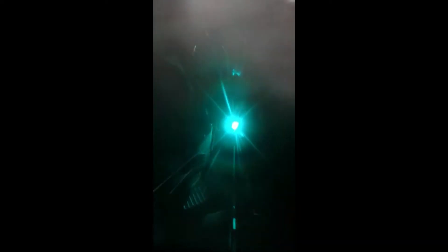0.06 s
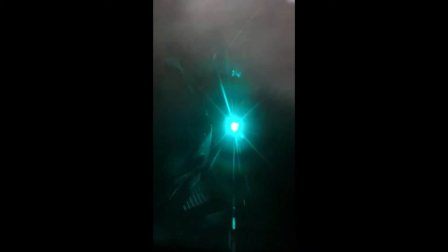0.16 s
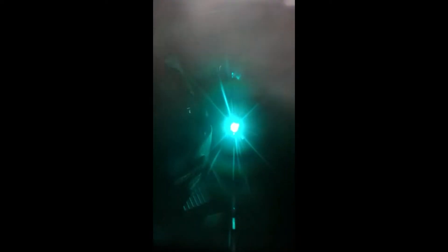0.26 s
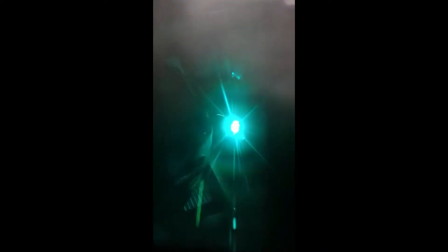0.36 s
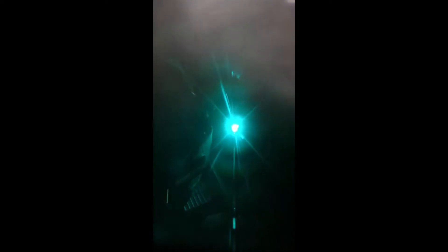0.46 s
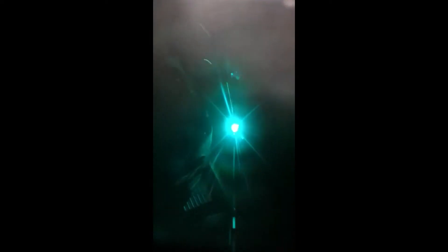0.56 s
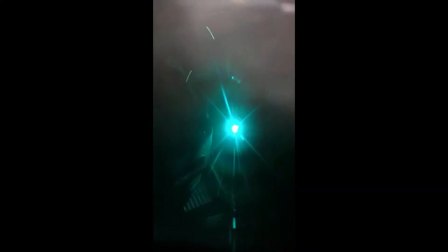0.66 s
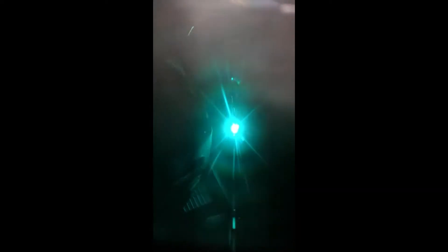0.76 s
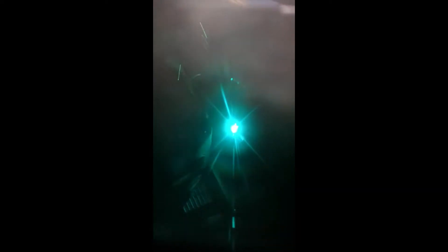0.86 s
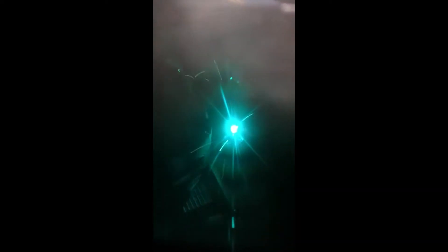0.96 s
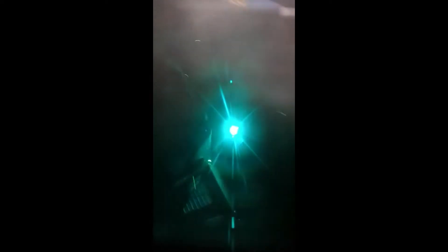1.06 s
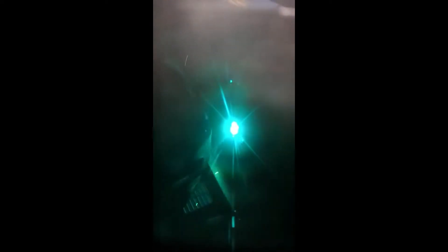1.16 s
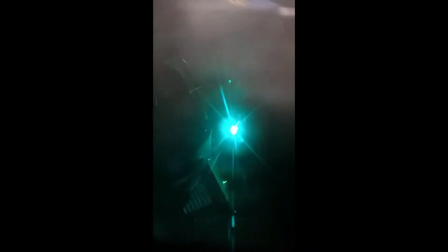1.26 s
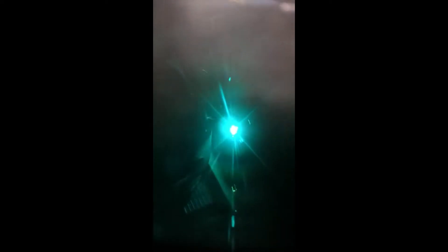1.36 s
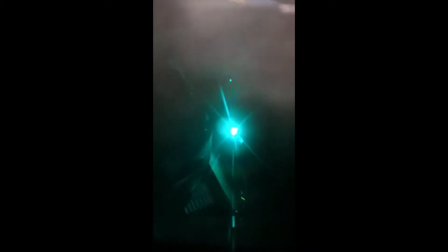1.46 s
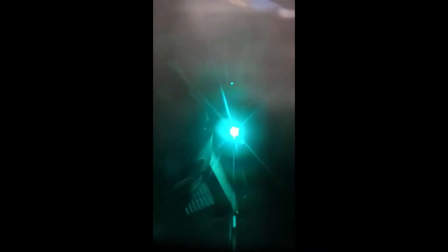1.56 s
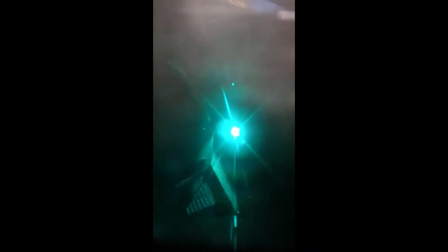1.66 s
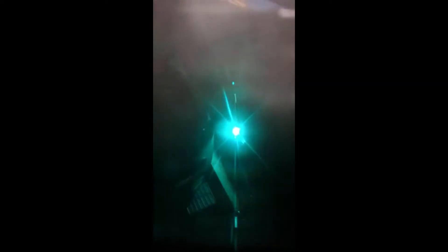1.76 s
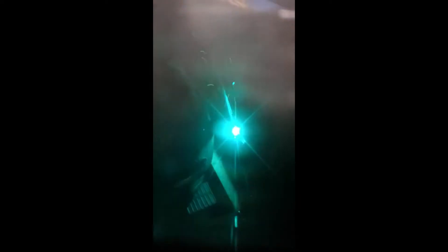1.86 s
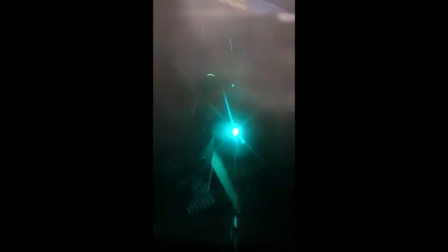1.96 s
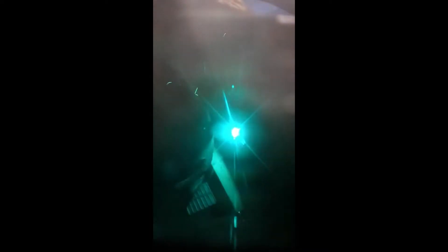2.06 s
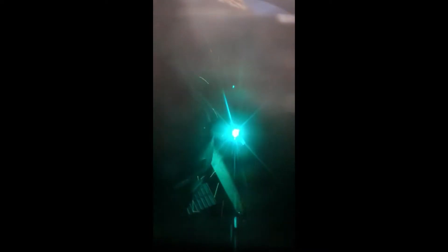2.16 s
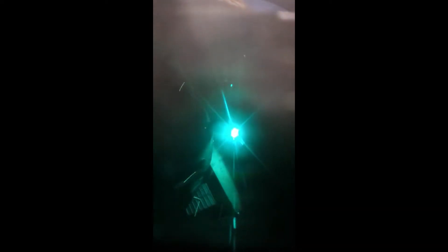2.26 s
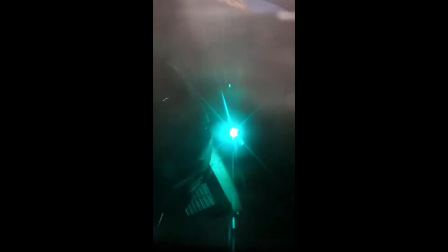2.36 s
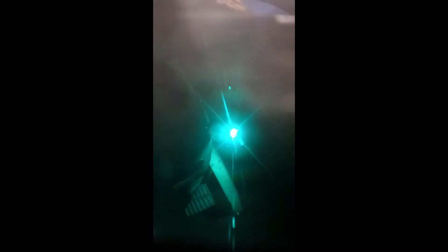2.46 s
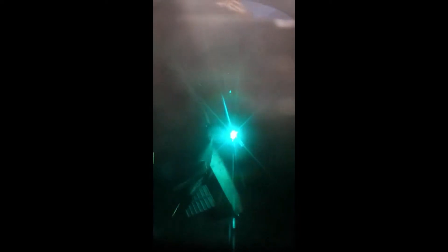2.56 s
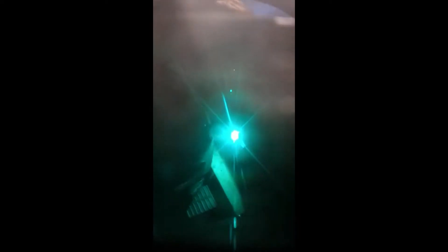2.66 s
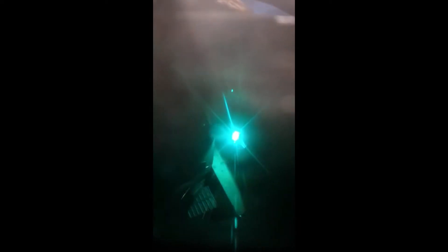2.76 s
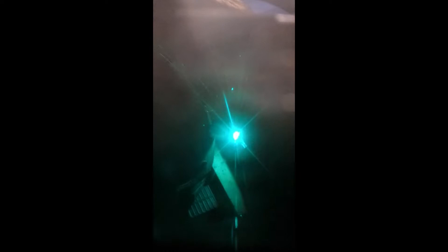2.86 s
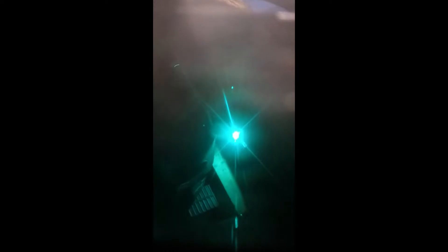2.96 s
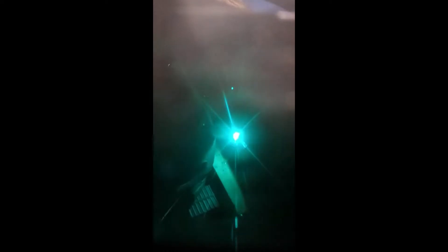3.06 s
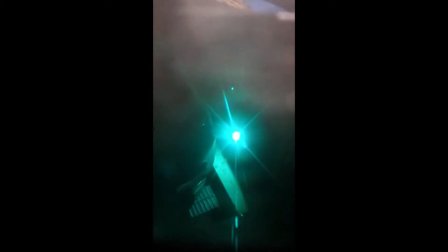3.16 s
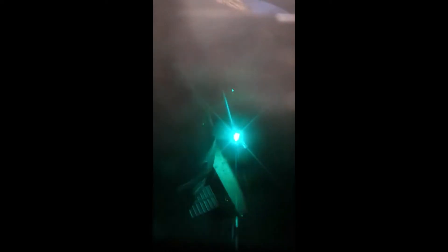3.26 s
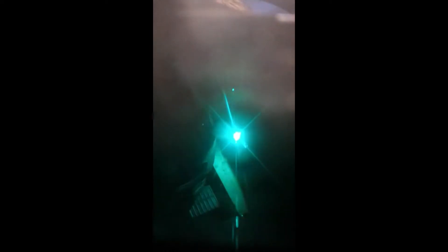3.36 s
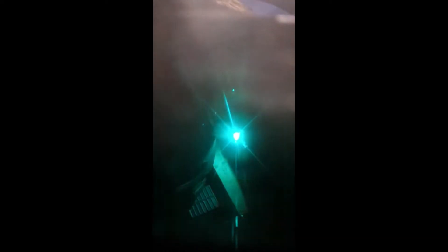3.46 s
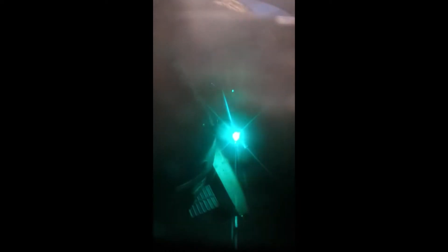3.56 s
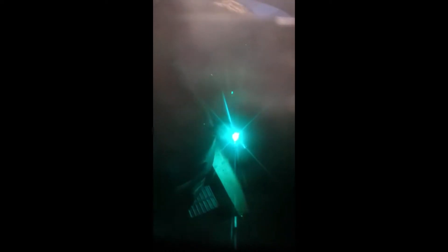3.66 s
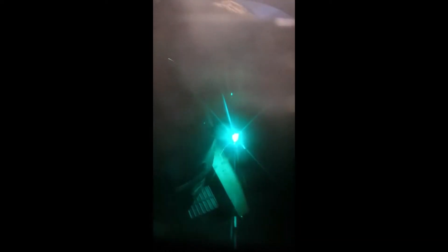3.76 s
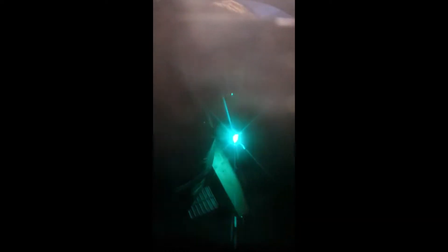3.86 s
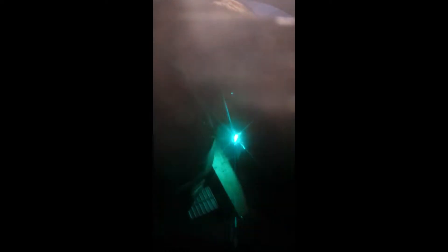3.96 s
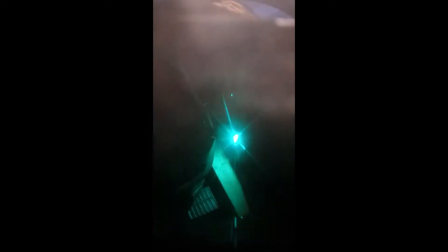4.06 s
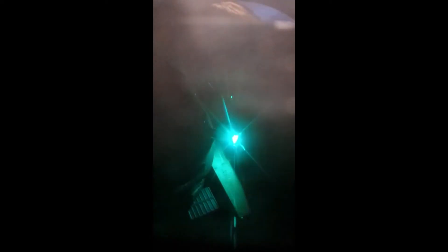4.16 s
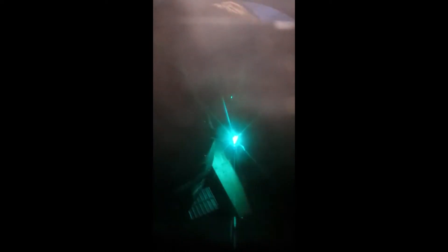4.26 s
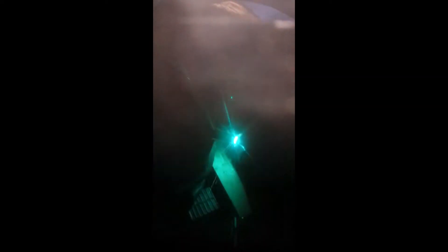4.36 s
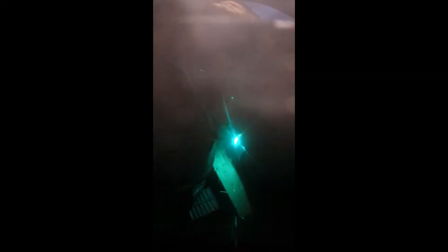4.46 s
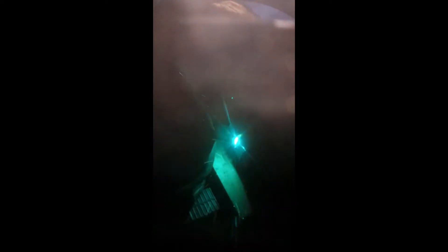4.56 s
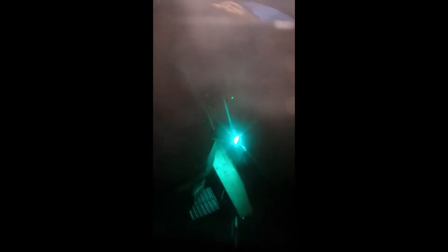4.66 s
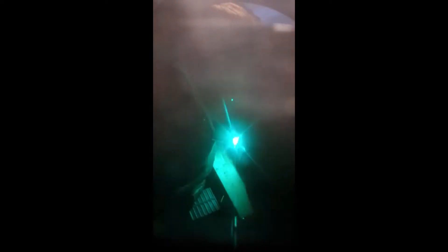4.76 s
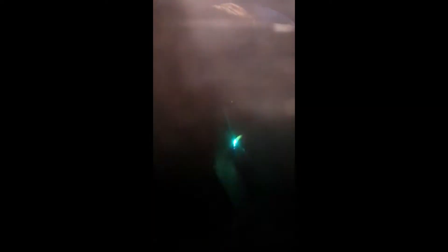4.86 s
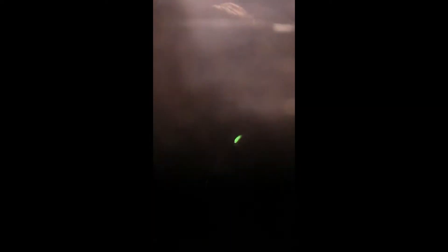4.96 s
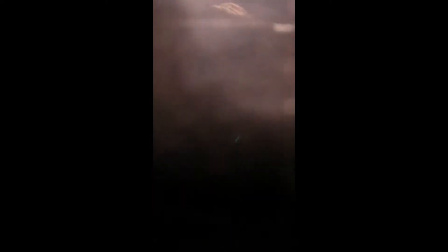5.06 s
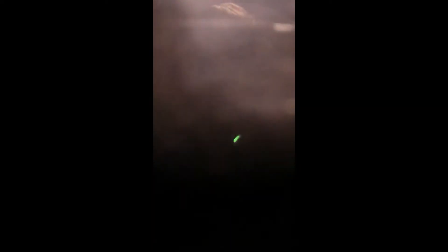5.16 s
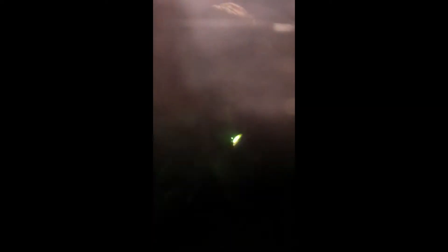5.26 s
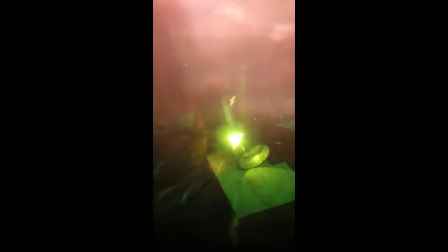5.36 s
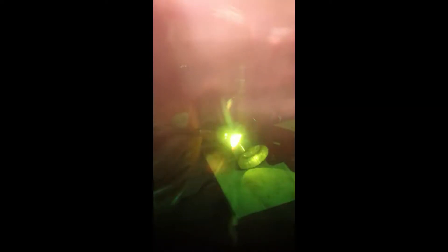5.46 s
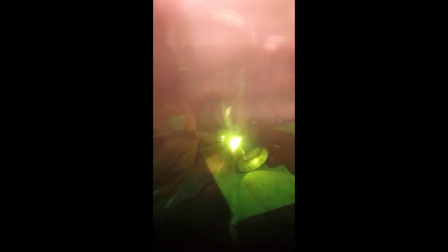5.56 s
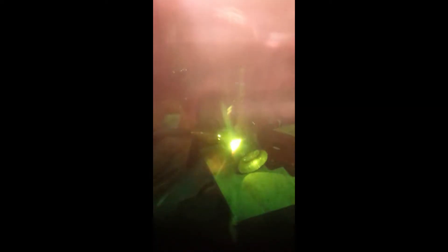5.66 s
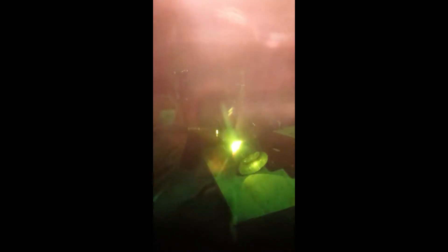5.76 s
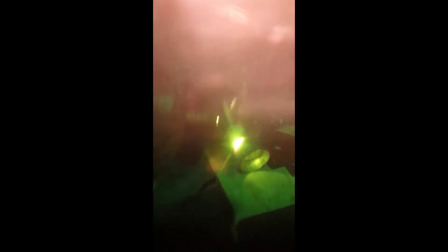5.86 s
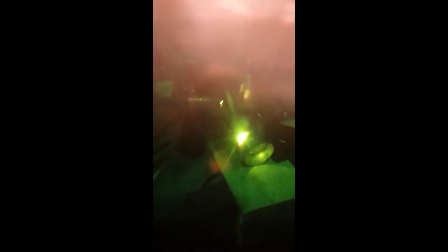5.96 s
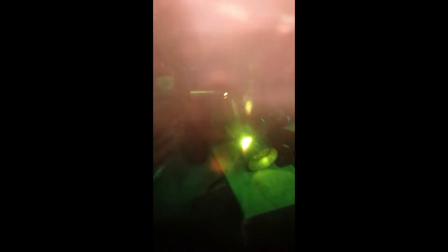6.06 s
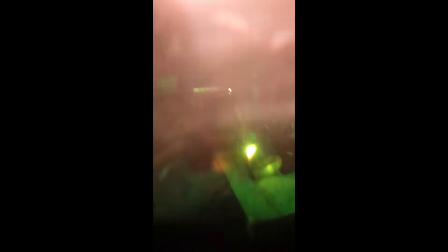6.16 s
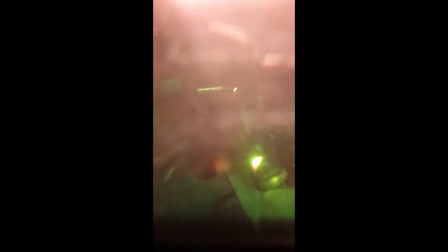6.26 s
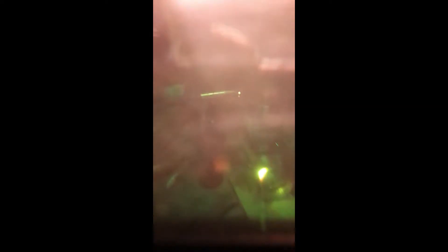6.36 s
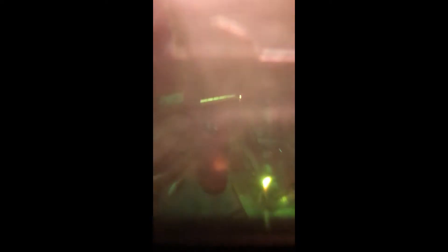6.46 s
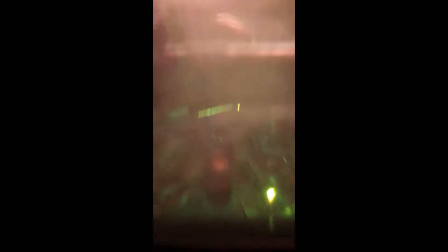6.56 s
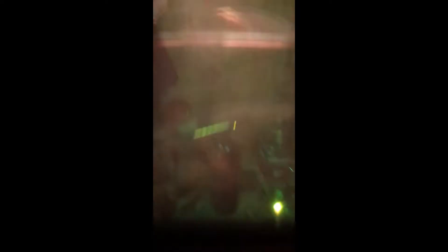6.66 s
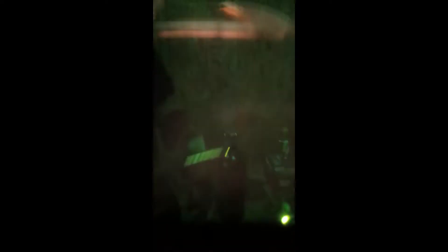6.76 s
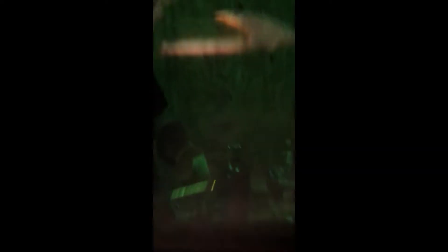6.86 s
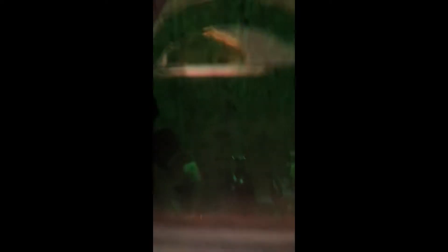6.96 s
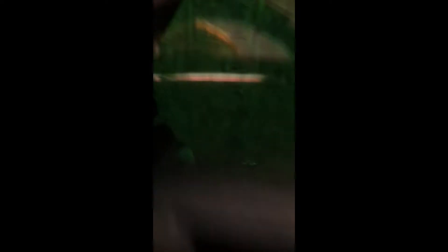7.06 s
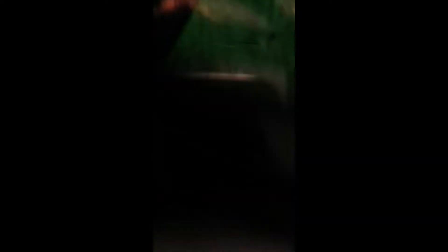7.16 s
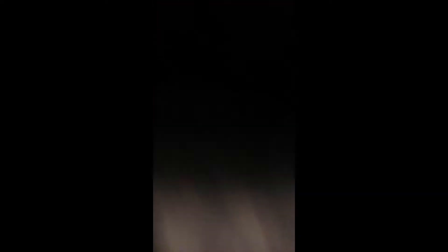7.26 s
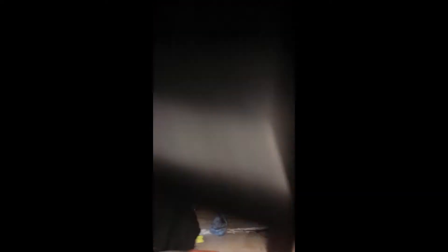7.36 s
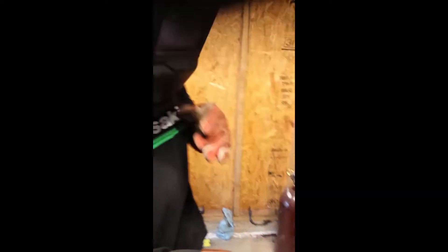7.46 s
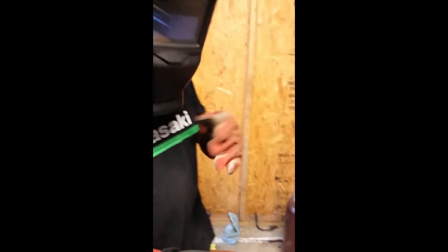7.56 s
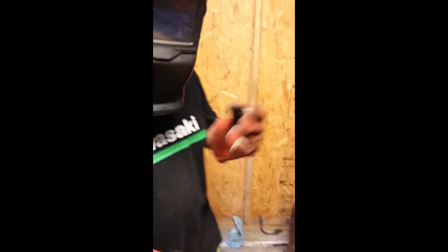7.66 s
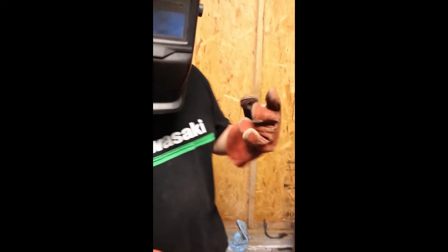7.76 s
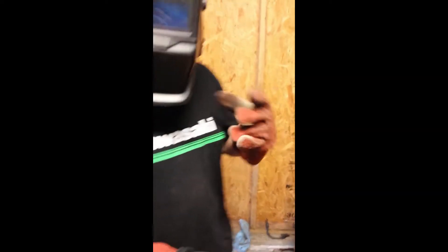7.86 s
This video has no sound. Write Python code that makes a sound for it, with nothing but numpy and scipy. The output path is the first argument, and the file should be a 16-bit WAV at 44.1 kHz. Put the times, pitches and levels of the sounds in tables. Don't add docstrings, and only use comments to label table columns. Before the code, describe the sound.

Close, raspy wire-feed welding with rapid irregular pops over buzzing hiss, then an abrupt stop, low wavering hum, a tiny tick and handling noises.

```python
import sys
import numpy as np
from scipy import signal
from scipy.fft import rfft, irfft
from scipy.io import wavfile
from scipy.ndimage import uniform_filter1d, minimum_filter1d

SR = 44100
rng = np.random.default_rng(int(sys.argv[2]) if len(sys.argv) > 2 else 0)


def elevation(decibels):
    levels = np.asarray(decibels, float)
    return 10 ** (levels / 20)


def store_pcm(level_fs):
    pcm = np.round(np.clip(level_fs, -1, 1) * 32767).astype(np.int16)
    wavfile.write(sys.argv[1], SR, np.atleast_2d(pcm).T)


N = 348390
T = np.arange(N) / SR

RIPPLE_HZ, RIPPLE_START_S = 120.0, 0.0022
ARC_END_S = 4.93

# start_s, pocket_strength_db, turned_aside (0-1)
MASK_TURN = [
    (0.0, -2, 0.16),
    (1.9, -0.5, 0.12),
    (2.6, 1.5, 0.53),
    (3.2, 0.5, 0.6),
    (4.93, 1.5, 0.88),
]
# pitch_hz, likeness (0-1)
ARC_SAME = [(60, 0.8), (180, 0.87), (550, 0.96), (1100, 0.23), (1900, 0.535), (2600, 0.14), (4970, 0.6),
            (15000, 0.015)]
# pitch_hz, likeness (-1 to 1)
AIR_SAME = [(60, 0.28), (180, 1), (550, 0.63), (1650, -0.3), (4970, 0.033), (15000, 0.25)]
# pitch_hz, level_db
ROAR = [(30, -86), (90, -23), (150, -11.5), (230, -3), (275, -5), (315, -0.5), (420, -19.5), (600, -18),
        (1000, -22.5)]


def evened(x):
    return x / np.sqrt(np.mean(x ** 2) + 1e-20)


def read(points, hz):
    f, value = np.transpose(points)
    return np.interp(np.log(hz + 1), np.log(f + 1), value)


def columns(rows):
    s, *values = np.transpose(rows)
    return [np.interp(T, s, v) for v in values]


def causal(gain):
    log_gain = np.log(np.r_[gain, gain[-2:0:-1]] + 1e-5)
    return np.fft.ifft(np.exp(np.conj(signal.hilbert(log_gain)))).real[:len(gain)]


def pair(same, count):
    a, b = rfft(rng.standard_normal((2, count)))
    likeness = np.clip(read(same, np.fft.rfftfreq(count, 1 / SR)), -1, 1)
    return irfft(np.array([a, likeness * a + np.sqrt(1 - likeness ** 2) * b]), count)


def shaped(x, spectrum):
    return evened(irfft(rfft(x) * elevation(read(spectrum, np.fft.rfftfreq(N, 1 / SR))), N))


def wander(per_s):
    knots = rng.standard_normal(int(N / SR * per_s) + 3)
    return evened(np.interp(T * per_s, np.arange(len(knots)), knots))


def idle():
    release_s, recovery_s = 5.82, 0.29
    back = 1 - np.exp(-np.maximum(T - release_s, 0) / recovery_s)
    creep_db = 4 * (np.clip(T, ARC_END_S, release_s) - ARC_END_S)
    clear = (1 + np.tanh((T - 7.16) / 0.091)) / 2
    air_db = -57.5 + creep_db + 16 * back - 2.5 * clear
    treble_db = -11 + 6.5 * clear
    hum_db = 3.5 + 2 * clear
    blade_db = -4 + 4.5 * back - 5.5 * clear
    return air_db, treble_db, hum_db, blade_db


def shop():
    # pitch_hz, level_db
    air_low = [(20, -38.5), (60, -14.5), (112, -15), (170, -6), (225, 2.5), (280, -5), (325, 3),
               (400, -6.5), (520, -7), (700, -7.5), (900, -9), (1150, -17.5), (2500, -20), (3500, -42)]
    air_high = [(710, -28), (1200, 0), (1660, -16), (1790, -9), (3180, 0.5), (5300, -0.5), (6510, -7.5),
                (13900, -18), (15500, -25), (16000, -63)]
    # pitch_hz, left_right_db
    air_pan = [(60, 0.45), (150, 1.7), (380, 0.46), (950, 1.4), (2380, 6), (5980, 6.1), (15000, 0.85)]
    tone_hz = [119.99, 239.98, 252.57, 505.14, 757.7, 861, 1010.3, 1262.9]
    # level_db, waver_db
    tone_levels = [(-21.5, 1.5), (0, -1), (-3.5, 0.5), (-7.5, 1), (-24.5, 1), (-15.5, 1.5), (-27, 4.5),
                   (-26.5, 2.5)]
    in_step_s = 6.977
    mask_off_s = 6.45
    pocket_hz, pocket_width_hz, pocket_db = 6000, 370, 5

    air_db, treble_db, hum_db, blade_db = idle()
    hz = np.fft.rfftfreq(N, 1 / SR)
    air = shaped(pair(AIR_SAME, N), air_low) * elevation(4.0 + wander(6.6))
    air += shaped(pair(AIR_SAME, N), air_high) * elevation(treble_db + 3.5 + 1.1 * wander(15))

    inside = np.clip((mask_off_s + 0.3 - T) * 5, 0, 1)
    pocket = (elevation(pocket_db) - 1) / (1 + (2 * (hz - pocket_hz) / pocket_width_hz) ** 2)
    air += inside * irfft(rfft(air) * pocket, N)
    lean_db = read(air_pan, hz) / 2
    air = irfft(rfft(air) * elevation(np.array([lean_db, -lean_db])), N)

    tones = []
    for pitch_hz, (level_db, waver_db) in zip(tone_hz, tone_levels):
        wave = np.sin(2 * np.pi * pitch_hz * (T - in_step_s))
        tones.append(elevation(level_db + waver_db * wander(8.5)) * wave)
    tones[5] = tones[5] * np.clip((mask_off_s - T) * 5, 0, 1)
    hum = sum(tones[:3]) + tones[5] + elevation(blade_db) * sum(tones[3:5] + tones[6:])
    hum_lean = elevation(np.array([[0.6], [-0.6]]))
    return elevation(air_db) * (air + np.sqrt(2) * elevation(hum_db) * hum * hum_lean)


def tick():
    # pitch_hz, level_db
    tick_colour = [(1500, -19), (4500, -12), (6000, -2), (7000, 2), (8500, -8.5), (12000, -14),
                   (16000, -16)]
    since = np.maximum(T - 5.5305, 0) / 0.0006
    return elevation(-44) * np.e * since * np.exp(-since) * shaped(rng.standard_normal((2, N)), tick_colour)


def rustles():
    # start_s, rise_s, fall_s, level_db, left_right_db
    touches = [
        (6.53, 0.018, 0.034, -44.5, 5.5),
        (6.661, 0.032, 0.039, -35.5, 3.5),
        (7.0, 0.046, 0.03, -46.5, 6),
        (7.154, 0.0012, .003, -42, 8.),
        (7.292, 0.024, 0.049, -39.5, 10.5),
        (7.859, 0.0028, 0.029, -30, 7),
    ]
    # pitch_hz, level_db
    plastic = [(880, -48), (1500, -9), (2190, -9), (2410, -12), (5440, 0.5), (6060, -6.5), (13000, -16),
               (16000, -20)]
    strength = np.zeros((2, N))
    for s, rise, fall, db, lean in touches:
        swell = np.exp(-((T - s) / rise) ** 2)
        fade = np.exp(-np.maximum(T - s, 0) / fall)
        sides = elevation(np.array([[db + lean / 2], [db - lean / 2]]))
        strength += np.where(T < s, swell, fade) * sides
    return strength * shaped(rng.standard_normal((2, N)), plastic) * elevation(2.0 * wander(300))


def thud():
    since = np.maximum(T - 4.94, 0)
    shape = (1 - np.exp(-since / 0.0044)) * np.exp(-since / 0.068)
    return elevation(-30) * shaped(pair(AIR_SAME, N), ROAR) * shape


def load_hum():
    # pitch_hz, level_db (rms)
    load_tones = [(120, -56.5), (240, -41.5), (360, -56)]
    on = np.exp(-np.maximum(T - ARC_END_S, 0) / 0.042)
    hum = 0
    for hz, db in load_tones:
        hum = hum + np.sqrt(2) * elevation(db + wander(9.1)) * np.sin(2 * np.pi * hz * T)
    return on * hum


def roar(drive, bass_db):
    power = signal.lfilter([1], [1, -np.exp(-1 / (0.0112 * SR))], drive ** 2) + 1e-12
    after = np.exp(-np.maximum(T - ARC_END_S, 0) / 0.12)
    return elevation(-37.5 + bass_db) * shaped(pair(ARC_SAME, N), ROAR) * evened(power ** 0.24 * after)


def tail():
    # pitch_hz, t60_s
    shop_t60 = [(660, 0.41), (1740, 0.3), (3600, 0.37), (6500, 0.5), (9000, 0.42), (13000, 0.24)]
    tail_db, gap_s = np.array([-0.5, -3.0]), 0.0011
    t = np.arange(SR // 2) / SR
    hz, frame_s, z = signal.stft(pair(ARC_SAME, len(t)), SR, nperseg=256)
    decay = elevation(-60 * frame_s / read(shop_t60, hz)[:, None])
    taps = signal.istft(z * decay, SR, nperseg=256)[1][:, :len(t)]
    taps = taps * (1 - np.exp(-t / gap_s))
    return elevation(tail_db)[:, None] * taps / np.linalg.norm(taps, axis=1, keepdims=True)


def rattle():
    fall_s, late_s = np.array([[0.0015], [0.0006]]), np.array([[0.0007], [0.00015]])
    direct, low_share = np.array([[0.5], [0.95]]), 0.66
    since = np.maximum(np.arange(600) / SR - late_s, 0) / fall_s
    z = rfft(rng.standard_normal(since.shape) * since ** 0.5 * np.exp(-since))
    z = z / np.sqrt(uniform_filter1d(abs(z) ** 2, size=21, axis=1))
    low = 1 / (1 + (np.fft.rfftfreq(600, 1 / SR) / 1900) ** 4)
    click = np.zeros(since.shape)
    click[[0, 1], [6, 0]] = 1
    mixed = z * (1 - low) + rfft(click) * (direct + low_share * low)
    return np.roll(irfft(mixed, 600), 30, axis=1)


def shell(x, share):
    late = signal.sosfilt(signal.butter(2, 1300, fs=SR, output="sos"), x)
    return x - share * np.roll(late, round(0.0027 * SR))


def port(x, spectrum, pockets):
    hz = np.fft.rfftfreq(8192, 1 / SR)
    pocket_db, turned = columns(MASK_TURN)
    plain = signal.oaconvolve(x, causal(elevation(read(spectrum, hz))))[:N]

    def resonance(db_column):
        lift = np.ones(len(hz))
        for pocket in pockets:
            bell = 1 + (2 * (hz - pocket[0]) / pocket[1]) ** 2
            lift = lift * (1 + (elevation(pocket[db_column]) - 1) / bell)
        return signal.oaconvolve(plain, causal(lift))[:N] - plain

    facing, aside = resonance(2), resonance(3)
    return plain + elevation(pocket_db) * (facing + np.clip(turned, 0, 1) * (aside - facing))


def current():
    # start_s, level_db
    course = [(0.0, 6.5), (0.22, -4), (0.6, -3), (0.9, 0), (1.2, -3), (1.62, 0.5), (1.8, 1), (2.0, -4.5),
              (2.31, 5), (2.43, -2), (2.6, 2.5), (2.88, 2.5), (3.2, -0.5), (3.5, 0), (3.8, 0.2),
              (4.4, -0.5), (4.68, -2), (4.93, -12.5)]
    # restrike_s, dimming_db
    shorts = [(0.101, 30.5), (.167, 18.5), (.344, 5.5), (.435, -2.5), (.569, 2), (.643, 8), (.81, -5),
              (.936, -0.5), (1.202, 24), (1.294, 13), (1.675, 19), (1.718, 7), (1.819, 7), (1.886, 21),
              (2.102, 11), (2.351, 13.5), (2.559, 3.5), (2.692, 2), (2.819, 17), (3.084, 5.5), (3.127, 19),
              (3.215, 13.5), (3.359, -2.5), (3.776, 7), (3.936, 12), (4.134, 17), (4.168, 11), (4.278, 3.5),
              (4.561, 14.5), (4.928, 6)]
    dim_db = sum(db * np.exp(-abs(s - T) / 0.026) * (T < s - 0.001) for s, db in shorts)
    return columns(course)[0], dim_db


def droplets(strength_db, pop_db):
    # start_s, peak_db
    drops_1 = [(0.0175, -14), (0.043, -10), (0.0696, -9.5), (0.0772, -8.0), (0.1027, -6.0), (0.1339, -12),
               (0.1429, -8), (0.1674, -7.5), (0.2337, -12.5), (0.26, -9), (0.267, -11.5), (0.2928, -12),
               (0.3008, -7.5), (0.3255, -13.5), (0.3444, -7.5), (0.3764, -11), (0.3832, -14.0),
               (0.4097, -10.5), (0.4358, -5), (0.444, -9.5), (0.4705, -13.0), (0.495, -12), (0.5178, -13.5),
               (0.5426, -11.5), (0.5696, -9.0), (0.5772, -8), (0.5856, -12.5), (0.6013, -9.5), (0.6107, -9),
               (0.6432, -6.5), (0.652, -15), (0.6764, -11), (0.7116, -12), (0.718, -12), (0.7354, -13),
               (0.7441, -8.5), (0.7686, -14), (0.81, -7.5), (0.8518, -10.5), (0.9173, -13.5), (0.9362, -8),
               (0.9623, -12.5), (0.9796, -11), (1.021, -11.5), (1.0358, -11.5), (1.062, -11),
               (1.1006, -12.0), (1.1292, -10.0), (1.1434, -15), (1.16, -17), (1.1679, -8.5), (1.1762, -12),
               (1.202, -6.5), (1.2106, -9.5), (1.2363, -9.5), (1.2588, -11), (1.2939, -8.5), (1.3175, -8.5),
               (1.3338, -12)]
    drops_2 = [(1.3611, -9), (1.3778, -14), (1.3939, -8.5), (1.4079, -11.5), (1.4287, -12.5),
               (1.4541, -10.5), (1.4959, -12), (1.5106, -16.5), (1.5179, -11), (1.5416, -13.0),
               (1.5581, -10), (1.6008, -9.5), (1.6754, -12.5), (1.6924, -9), (1.7181, -4), (1.7264, -11.0),
               (1.7442, -14.5), (1.7539, -13.0), (1.778, -10), (1.7865, -16.5), (1.801, -11.5),
               (1.8193, -7), (1.8276, -12.5), (1.862, -12.0), (1.8863, -10.5), (1.9082, -9.5),
               (1.9328, -14.5), (1.9538, -15), (1.9753, -12.5), (1.9953, -13), (2.0123, -14.5),
               (2.0282, -12.0), (2.0418, -10), (2.0581, -11.5), (2.0753, -13.5), (2.1014, -9.5),
               (2.1087, -5.5), (2.1173, -14.5), (2.1427, -7.5), (2.1615, -11.0), (2.1834, -10),
               (2.2005, -3), (2.2202, -13), (2.2275, -16.0), (2.2629, -14), (2.2683, -16.5), (2.2783, -14),
               (2.2852, -12.5), (2.2933, -7.5), (2.3017, -9.5), (2.3109, -8.5), (2.3187, -9.5),
               (2.3422, -8), (2.3514, -7), (2.3601, -13.0), (2.415, -13), (2.4363, -16.5), (2.4428, -10.0),
               (2.4512, -17)]
    drops_3 = [(2.4598, -8.5), (2.4685, -16), (2.4835, -12), (2.5028, -17.5), (2.509, -13), (2.533, -15.5),
               (2.5525, -13.5), (2.5596, -10.5), (2.5675, -17), (2.5773, -16), (2.5857, -10.5),
               (2.5932, -10), (2.6021, -9), (2.6103, -7.5), (2.6426, -14), (2.652, -14.5), (2.6922, -9.5),
               (2.7007, -18), (2.7103, -16), (2.717, -11), (2.7357, -14), (2.742, -10.0), (2.7519, -9),
               (2.7608, -8), (2.7688, -16), (2.7862, -7.5), (2.7931, -10.5), (2.802, -12), (2.8106, -13.5),
               (2.8187, -13), (2.826, -9.0), (2.8343, -17.5), (2.8518, -7), (2.8605, -9), (2.8705, -10),
               (2.8841, -11.5), (2.8937, -8.5), (2.9024, -7.0), (2.911, -14.5), (2.927, -9),
               (2.9363, -10.5), (2.9443, -14.0), (2.9918, -11), (3.01, -15.0), (3.0355, -19),
               (3.0422, -16.5), (3.0848, -9.5), (3.0941, -11), (3.1014, -10.5), (3.1273, -9.5),
               (3.1357, -14), (3.1434, -15.5), (3.2148, -15), (3.2354, -12.5), (3.2436, -18),
               (3.269, -17.0), (3.2774, -18), (3.3002, -9), (3.3091, -13.5)]
    drops_4 = [(3.3362, -13.5), (3.3594, -6.0), (3.3681, -14.5), (3.4009, -17), (3.4112, -11.0),
               (3.4331, -14.5), (3.4508, -11), (3.4612, -11.5), (3.492, -11), (3.5023, -15), (3.5199, -7.5),
               (3.5286, -15), (3.5446, -10), (3.5533, -18.5), (3.5606, -16.5), (3.5694, -8.5),
               (3.5761, -12.0), (3.6012, -10.0), (3.611, -12), (3.6255, -12), (3.6441, -13.5),
               (3.6498, -10), (3.659, -18), (3.6751, -13), (3.6855, -11), (3.7108, -15.0), (3.718, -16.0),
               (3.7256, -12), (3.7434, -12.5), (3.7518, -8.5), (3.7611, -17), (3.7688, -15.5),
               (3.777, -7.5), (3.7849, -9.5), (3.7947, -16.5), (3.811, -11), (3.8195, -13.5),
               (3.8367, -12.5), (3.8866, -17), (3.8952, -11), (3.9105, -14.5), (3.9363, -8.5),
               (3.944, -9.5), (3.952, -16.5), (3.9685, -15), (3.976, -12.5), (3.986, -10.5),
               (3.9941, -14.5), (4.0026, -15.0), (4.0107, -8.5), (4.0192, -10.5), (4.0348, -15),
               (4.0443, -10.0), (4.0525, -14.0), (4.0785, -12), (4.0902, -14), (4.1346, -9.5),
               (4.1436, -15), (4.1599, -18)]
    drops_5 = [(4.1694, -7.5), (4.1773, -8.0), (4.1858, -17.5), (4.1934, -13.5), (4.2018, -16),
               (4.2185, -18), (4.2246, -13), (4.254, -14), (4.2778, -11), (4.2871, -15.5), (4.295, -11.5),
               (4.3106, -11.5), (4.318, -9), (4.3349, -11.5), (4.3432, -8), (4.351, -12.5), (4.3592, -15.5),
               (4.3782, -13), (4.3872, -15.0), (4.395, -19.0), (4.4021, -10.5), (4.4105, -13.5),
               (4.4194, -13.5), (4.4261, -10.0), (4.4356, -8.5), (4.4444, -10.5), (4.4715, -14),
               (4.5035, -10.5), (4.5124, -19), (4.5367, -11.0), (4.545, -15.5), (4.561, -7.0),
               (4.5686, -10.0), (4.5767, -13), (4.5859, -17), (4.5947, -9), (4.6021, -12.5), (4.6123, -13),
               (4.636, -17), (4.6437, -10.5), (4.652, -11), (4.669, -11.5), (4.6783, -11), (4.6858, -13),
               (4.6911, -11), (4.7008, -20.5), (4.7234, -12.0), (4.7357, -11.5), (4.746, -15),
               (4.7554, -14.0), (4.786, -14), (4.7938, -17), (4.816, -11), (4.8246, -18), (4.8478, -18),
               (4.8777, -12), (4.8853, -16.5), (4.9195, -15.5), (4.9281, -10)]
    s, db = np.transpose(drops_1 + drops_2 + drops_3 + drops_4 + drops_5)

    spatter_share, crest_jitter_s = 0.3, 0.001
    crest = np.arange(RIPPLE_START_S, ARC_END_S, 1 / RIPPLE_HZ)
    late, size = np.clip(rng.standard_normal((700, 2)), -2.5, 1.0)[:len(crest)].T
    at = np.clip((crest + crest_jitter_s * late) * SR, 0, N).astype(int)
    free = abs(crest[:, None] - s).min(1) > 0.005
    spatters = rng.random(len(at)) < spatter_share
    steps = np.zeros(N)
    steps[at] = free * spatters * elevation(strength_db[at] - 0.5 + 3.5 * size)

    burst_s, burst_steps, aftershock = 0.0018, 3, 0.9
    when, share = rng.random((len(s), 2, burst_steps)).transpose(1, 0, 2)
    first = np.arange(burst_steps) == 0
    when = when * ~first
    share = np.where(first, 1, aftershock * (share - 0.5))
    at = ((s[:, None] - 0.0002 + burst_s * when) * SR).astype(int)
    np.add.at(steps, at, share * elevation(1.067 * db + pop_db)[:, None])
    return steps


def strikes():
    course_db, dim_db = current()
    sizzle_db = -17.5 - 1.9 * T + 0.8 * course_db - 0.4 * dim_db
    crest = np.arange(RIPPLE_START_S, ARC_END_S, 1 / RIPPLE_HZ)
    late, size = rng.standard_normal((700, 2))[:len(crest)].T
    at = np.clip((crest + 0.001 * late) * SR, 0, N).astype(int)
    train = np.zeros(N)
    train[at] = elevation(sizzle_db[at] + 9.0 + 3 * size)
    train += droplets(course_db - 1.3 * dim_db, pop_db=16.0)
    pulsing = 1 + 0.37 * np.cos(2 * np.pi * RIPPLE_HZ * (T - RIPPLE_START_S))
    hiss = elevation(sizzle_db - 8.0 + 3.7 * wander(40)) * pulsing * rng.standard_normal(N)
    return train + hiss * (T < ARC_END_S)


def arc():
    # pitch_hz, level_db
    left_colour = [(150, -28), (420, -14.5), (700, -20.5), (1200, -14), (2400, -4.5), (3200, -8.5),
                   (4300, -2.5), (6900, -1.5), (8400, -4.5), (11000, 0), (14500, -1.5), (15600, -1.5),
                   (16300, -38)]
    right_colour = [(150, -57.5), (420, -10.5), (900, -12), (1500, -17), (2400, -8.5), (3200, -9),
                    (5000, -5.5), (6800, -5.5), (9500, 1.5), (11500, -3), (14500, -3), (15600, -8.5),
                    (16300, -58)]
    # pitch_hz, width_hz, facing_lift_db, aside_lift_db
    left_pockets = [(610, 82, 6, 4), (855, 275, 13.5, 18), (1813, 123, 11, 16.5), (3150, 250, -3, -5),
                    (3573, 160, 9.5, 12), (4993, 370, 9, 3.5), (5856, 334, 5.5, 12.5), (6250, 260, 7.5, 0),
                    (7870, 200, 10, 5.5)]
    right_pockets = [(572, 51, 8.5, 7), (1725, 280, 7, 14.5), (2360, 440, -6, -14), (7530, 260, 4.5, 1.5),
                     (7960, 400, 7, 3), (8550, 317, 7, 12), (9800, 1330, 1.5, -0.5)]
    count, turns_per_s = 8, 1.477

    pocket_db = columns(MASK_TURN)[0]
    drive = strikes()
    cycle = (T * RIPPLE_HZ + 0.3).astype(int)
    choice = rng.integers(0, count, cycle[-1] + 1)[cycle]
    both = np.zeros((2, N))
    for k in range(count):
        both += signal.oaconvolve((drive * (choice == k))[None], rattle(), axes=1)[:, :N]
    for k in range(3):
        share = np.sqrt(2 / 3) * np.cos(np.pi * (turns_per_s * T + k / 3))
        both += signal.fftconvolve((drive * share)[None], tail(), axes=1)[:, :N]

    left = port(shell(both[0], 0.8), left_colour, left_pockets)
    right = port(shell(both[1], 0.2), right_colour, right_pockets)
    lean_db = (0.4 - 0.41 * T) / 2
    ports = np.array([left, right]) * elevation(np.array([lean_db, -lean_db]))
    return ports + roar(drive, 0.3 * pocket_db)


def scene():
    return arc() + load_hum() + thud() + shop() + rustles() + tick()


def starved(x):
    # pitch_hz, dip_db
    dip_loud = [(500, 9), (700, 5), (900, 7), (1100, 4.5), (1700, 7), (2400, 3.5), (2800, 4), (3050, 1.3),
                (3320, 1.3), (3500, 6), (4120, 2.8), (4600, 3.8), (5200, 5), (7000, 6), (14500, 5),
                (15200, 2), (15900, -3)]
    dip_quiet = [(3000, 30), (6000, 8), (9000, 3), (11000, 1), (14600, .6), (15100, -1), (15600, -9)]
    size = 8
    hz, _, z = signal.stft(x, SR, nperseg=2048, noverlap=1536)
    bands = (abs(z[:, :1024]) ** 2).reshape(2, -1, size, z.shape[-1]).mean(2)
    bands = 0.5 * uniform_filter1d(bands + bands.mean(0), size=2, axis=2)
    band_db = 10 * np.log10(bands + 1e-20)
    frame_db = 10 * np.log10(bands[:, 24:90].mean((0, 1)) + 1e-20)
    band_db = band_db - np.median(band_db[:, :96], axis=1, keepdims=True)

    centre = hz[size // 2:1024:size]
    is_loud = uniform_filter1d(frame_db, size=41) > -59
    allowed = np.where(is_loud, read(dip_loud, centre)[:, None], read(dip_quiet, centre)[:, None])
    gone = band_db < uniform_filter1d(band_db, 25, 2) - allowed
    gain = minimum_filter1d(np.where(gone, elevation(-40), 1), size=3, axis=2)
    gain = np.repeat(gain, size, axis=1)
    gain = np.concatenate([gain, gain[:, -1:]], axis=1)
    return signal.istft(z * gain, SR, nperseg=2048, noverlap=1536)[1][:, :N]


def roll_off(x):
    return signal.sosfilt(signal.butter(12, 16520, fs=SR, output="sos"), x)


def record(dry):
    edge = signal.firwin(255, 15900, window=("kaiser", 8), fs=SR)
    hissing = dry + elevation(-77) * rng.standard_normal(dry.shape)
    limited = signal.oaconvolve(np.clip(hissing, -1, 1), edge[None], "same")
    finished = starved(limited)
    return roll_off(finished)


dry = scene()
out = record(dry)
store_pcm(out)
```